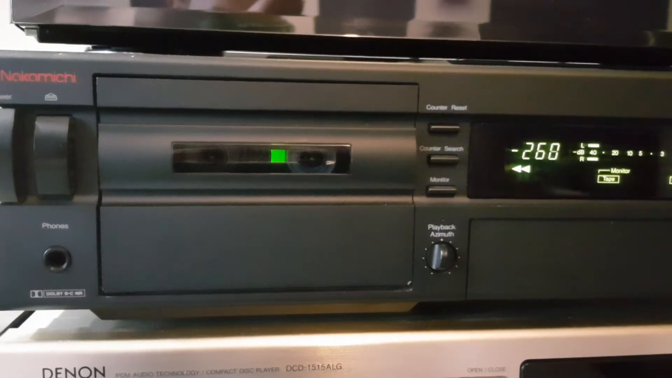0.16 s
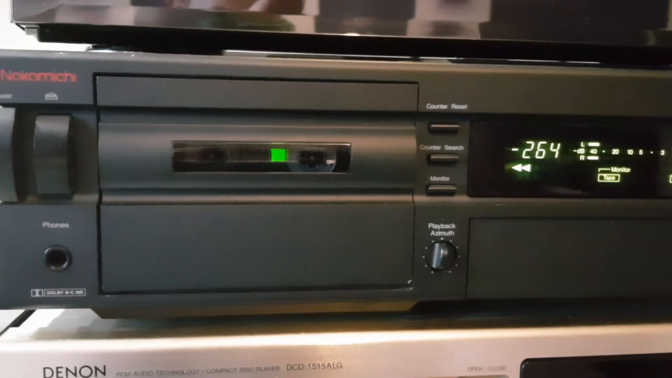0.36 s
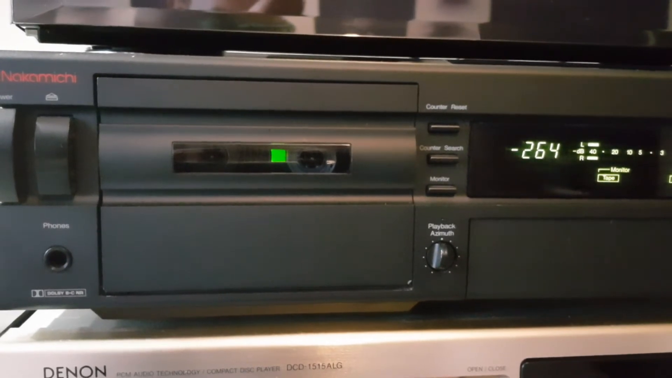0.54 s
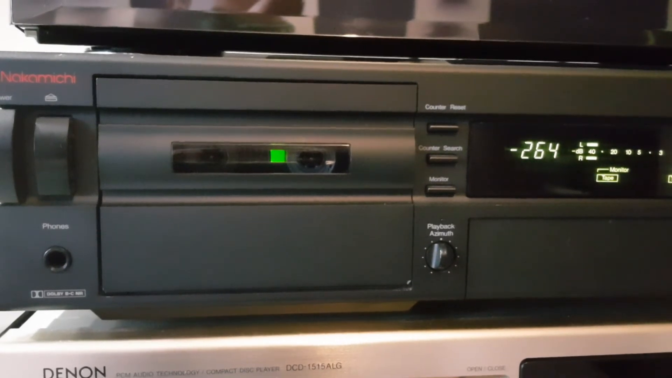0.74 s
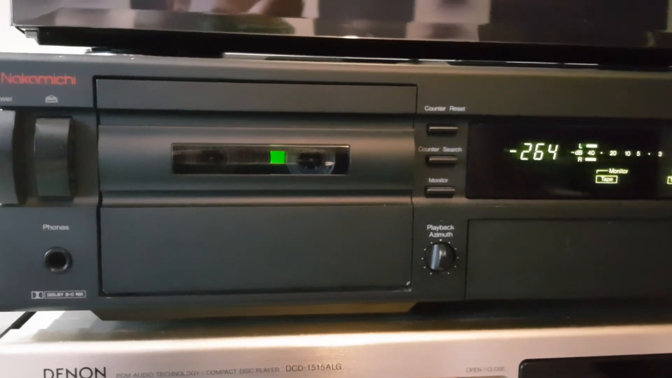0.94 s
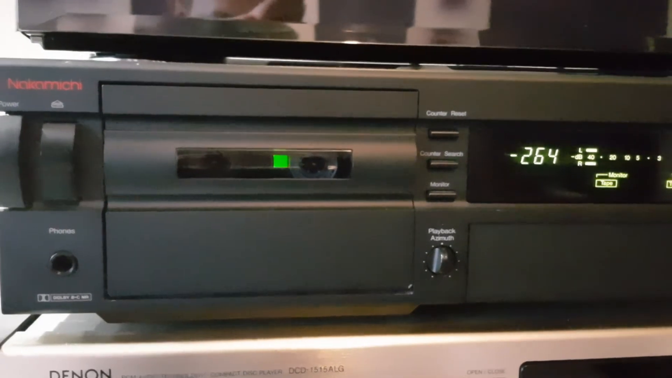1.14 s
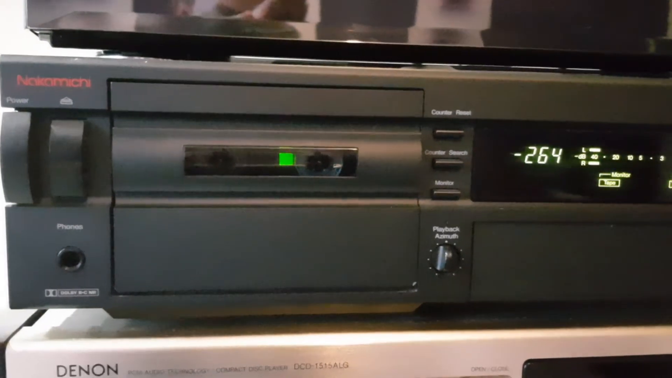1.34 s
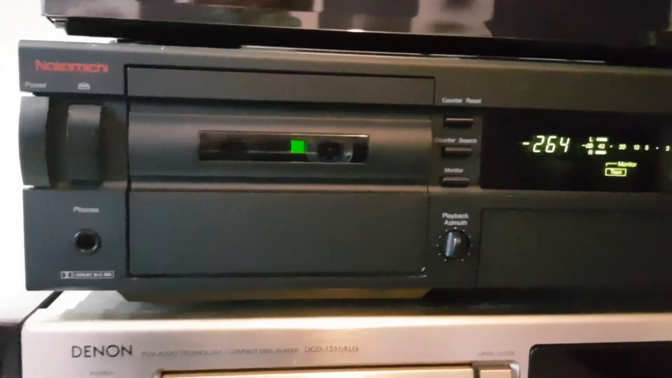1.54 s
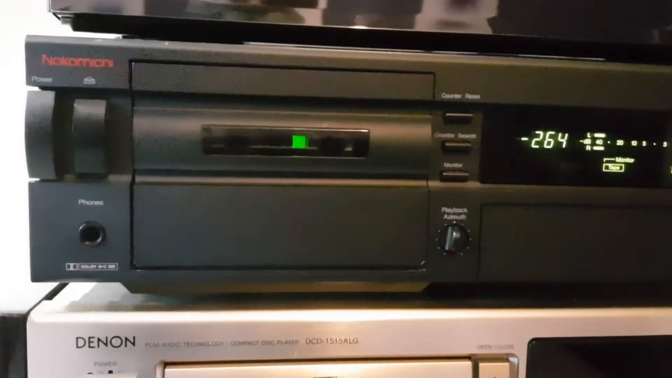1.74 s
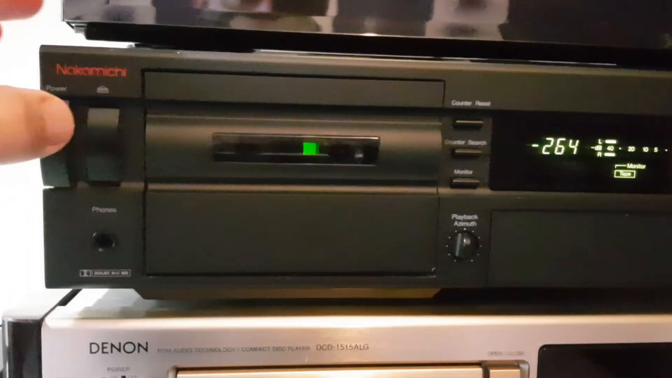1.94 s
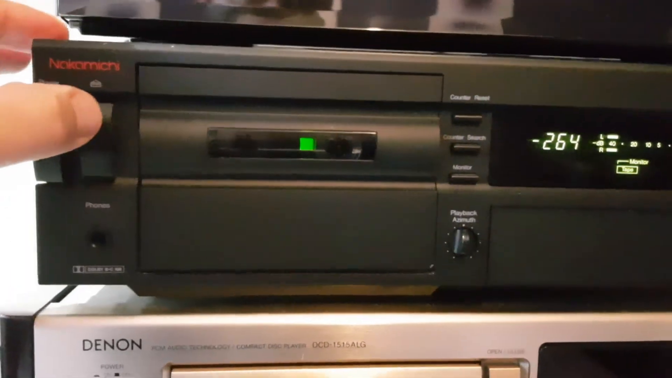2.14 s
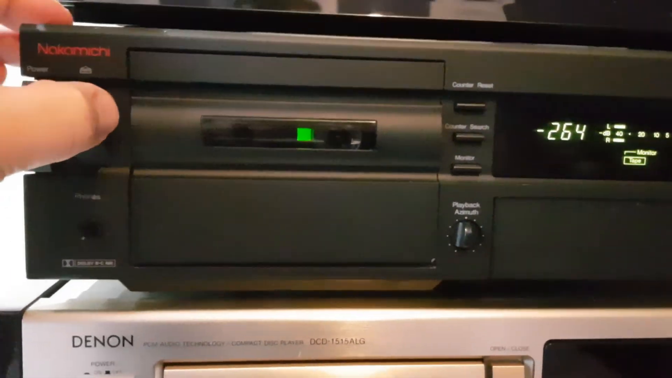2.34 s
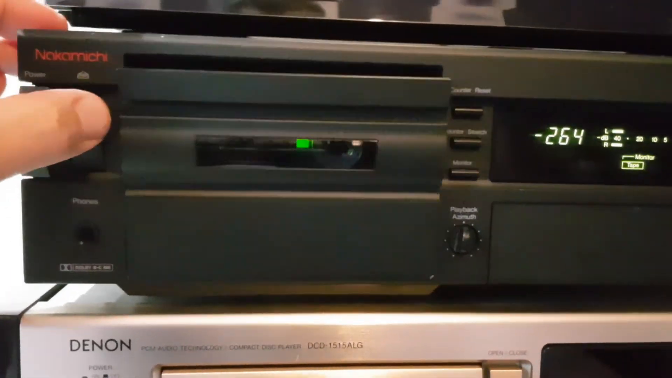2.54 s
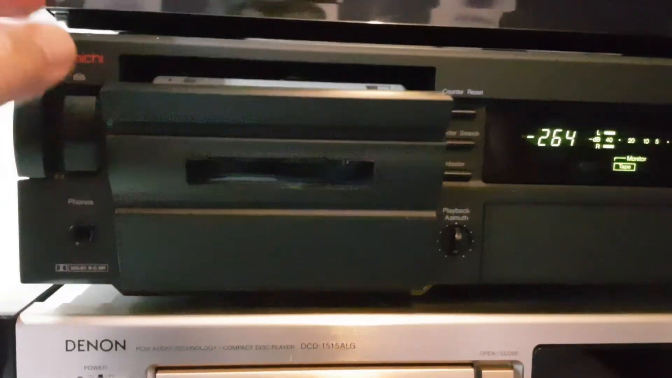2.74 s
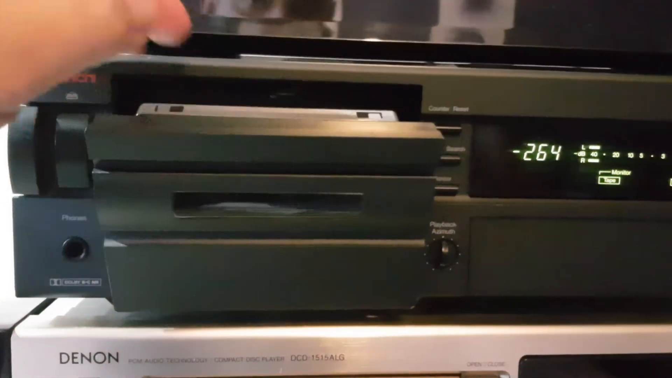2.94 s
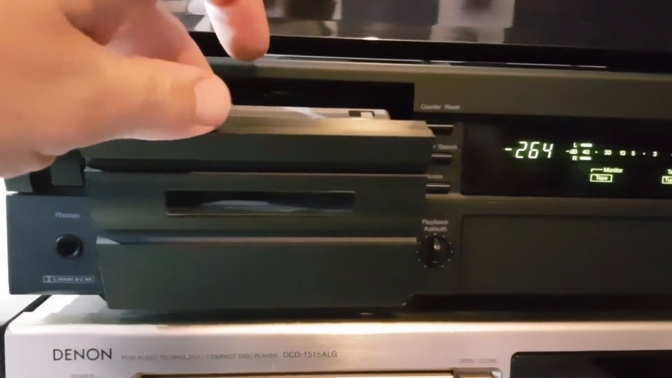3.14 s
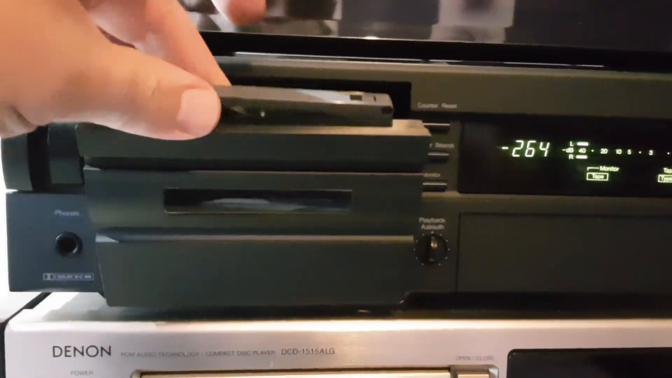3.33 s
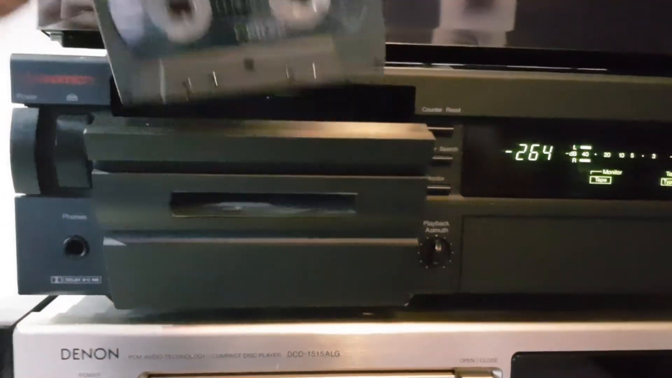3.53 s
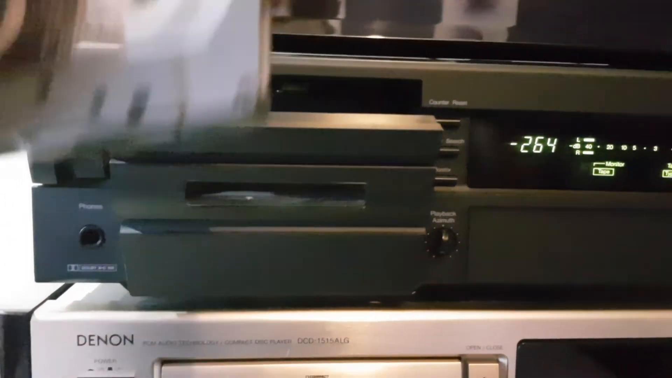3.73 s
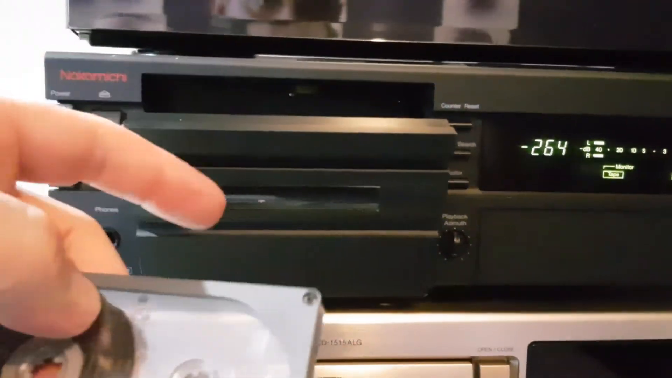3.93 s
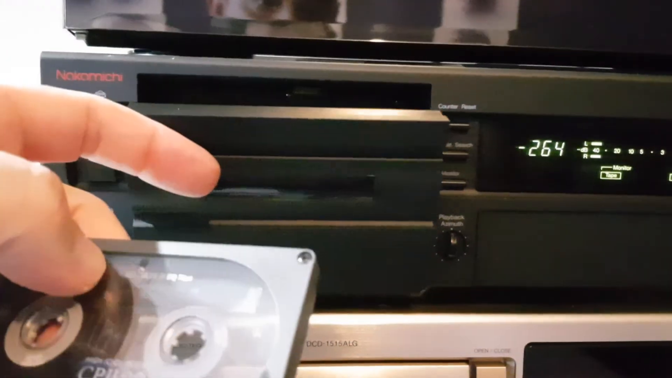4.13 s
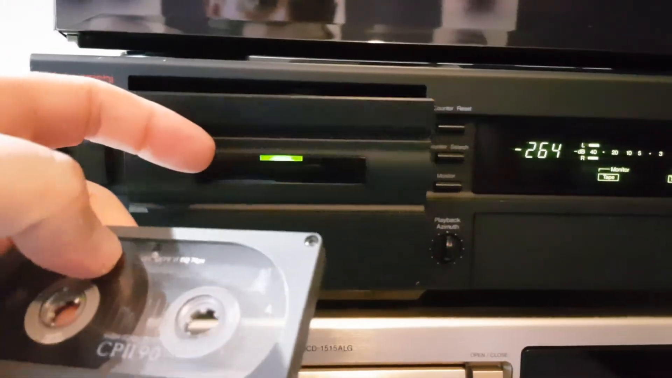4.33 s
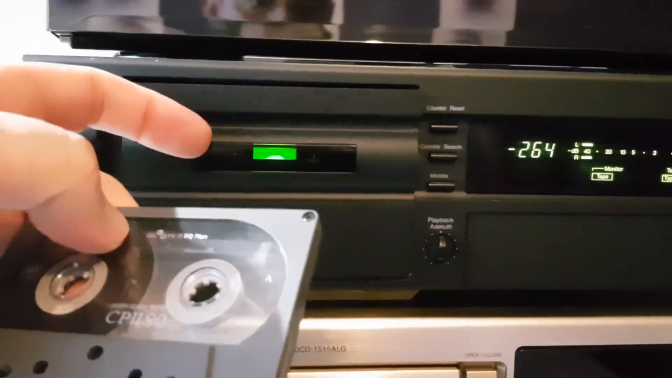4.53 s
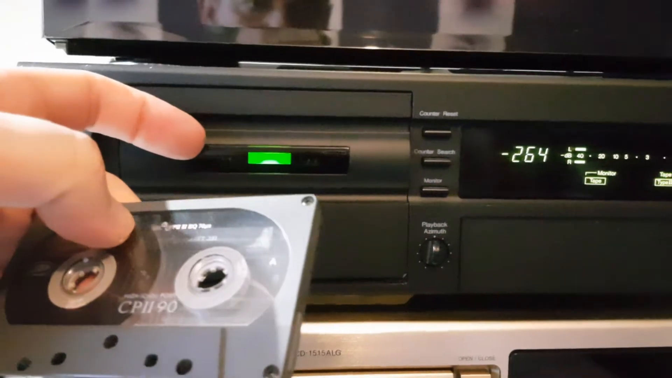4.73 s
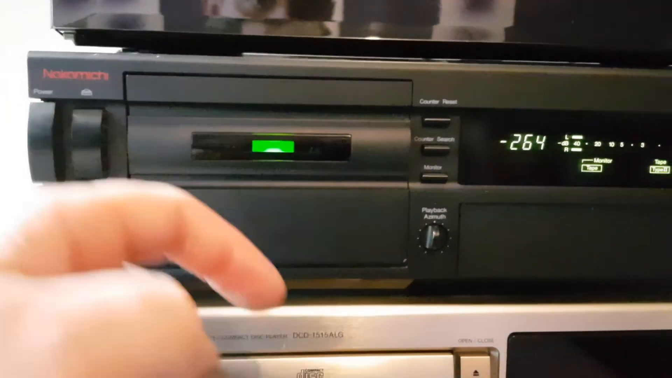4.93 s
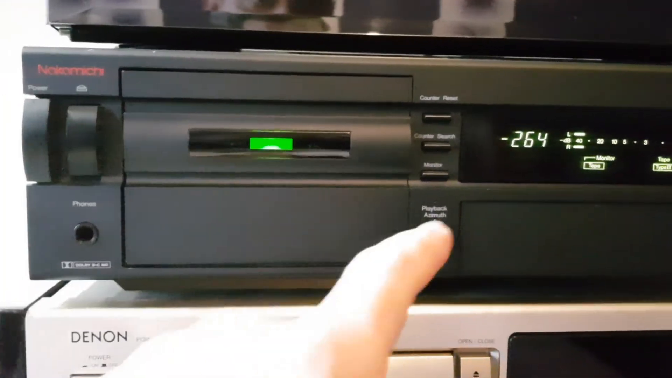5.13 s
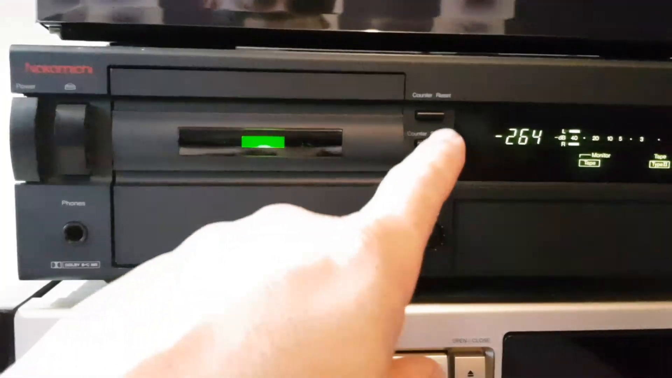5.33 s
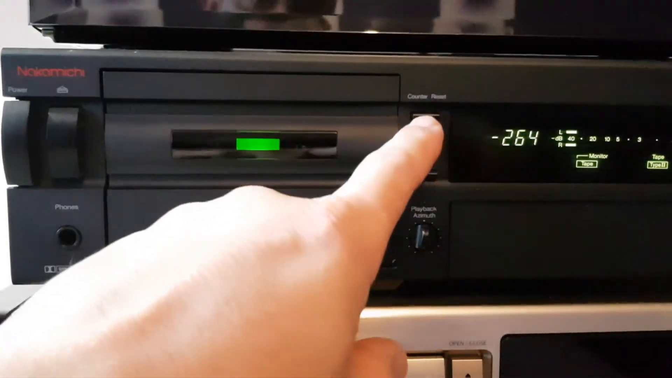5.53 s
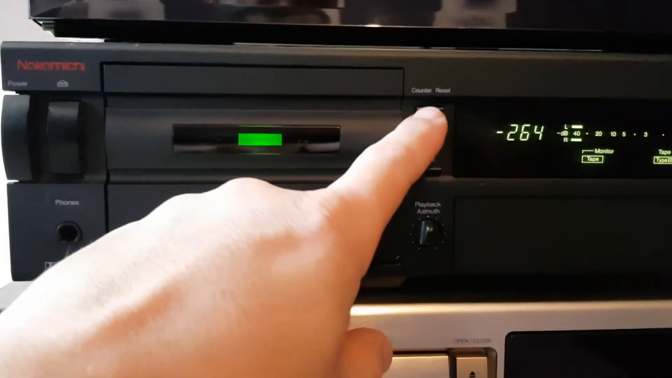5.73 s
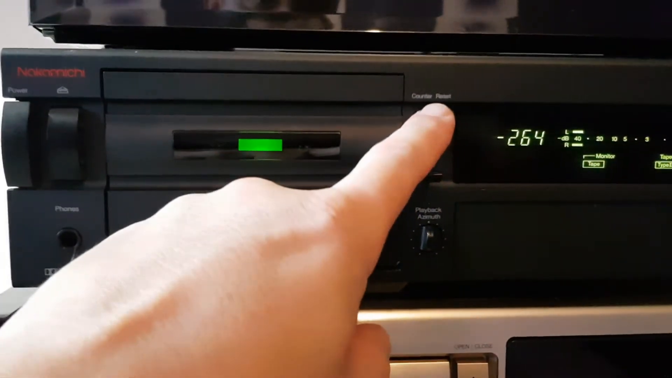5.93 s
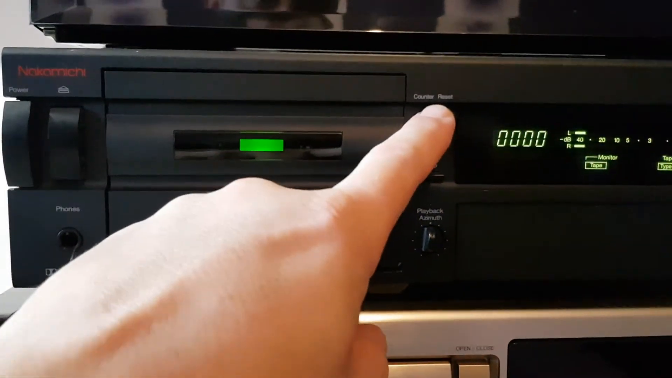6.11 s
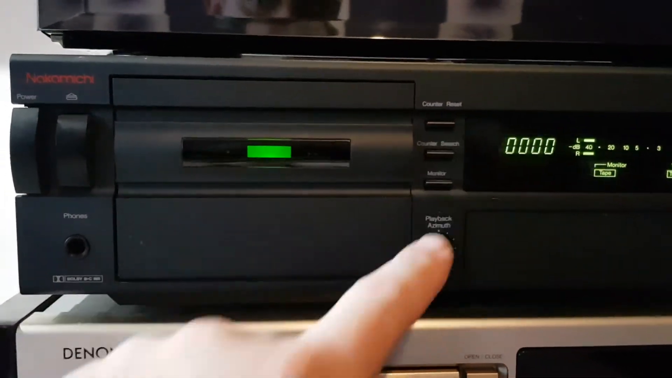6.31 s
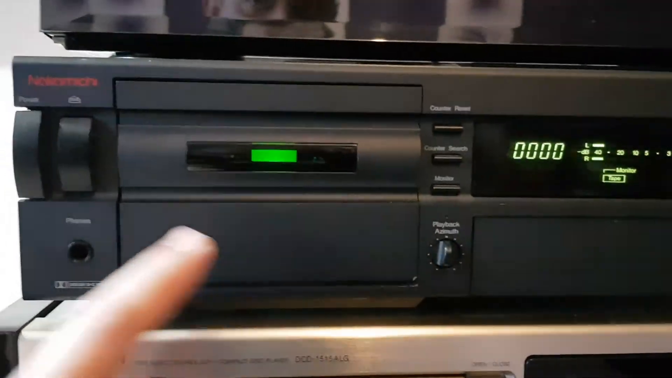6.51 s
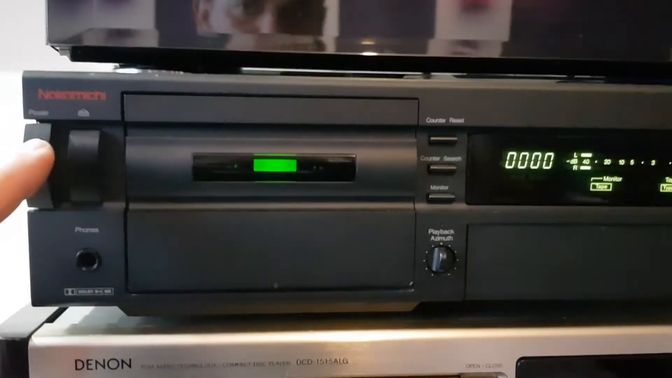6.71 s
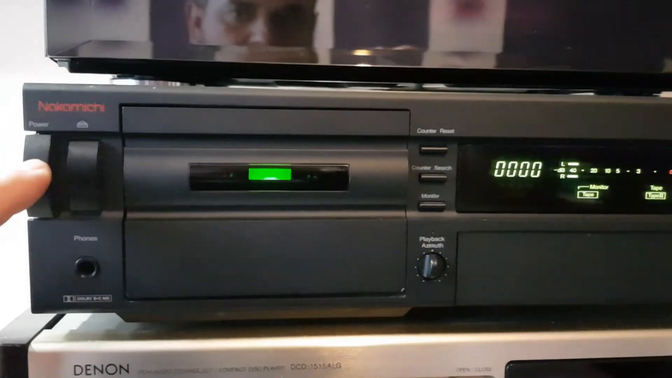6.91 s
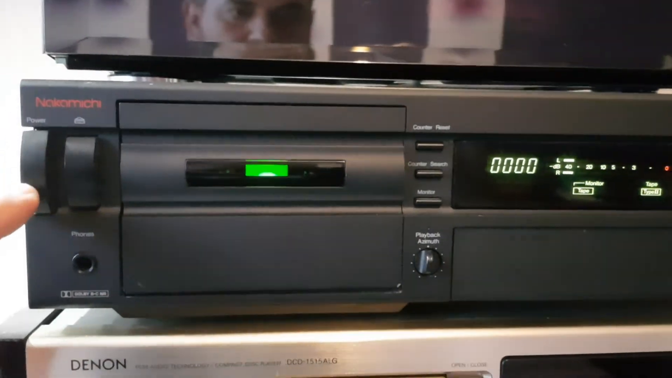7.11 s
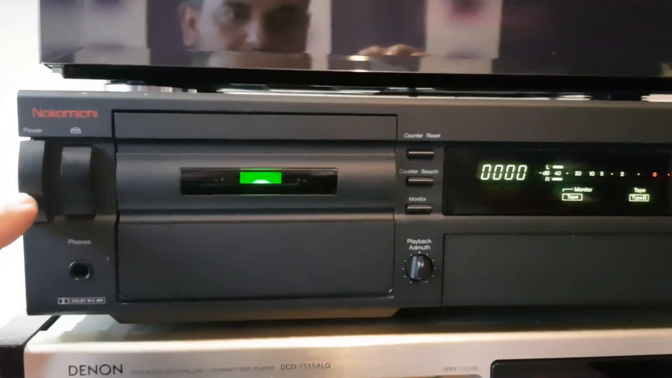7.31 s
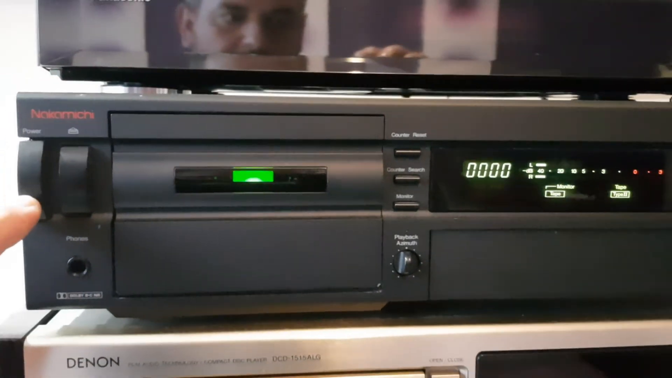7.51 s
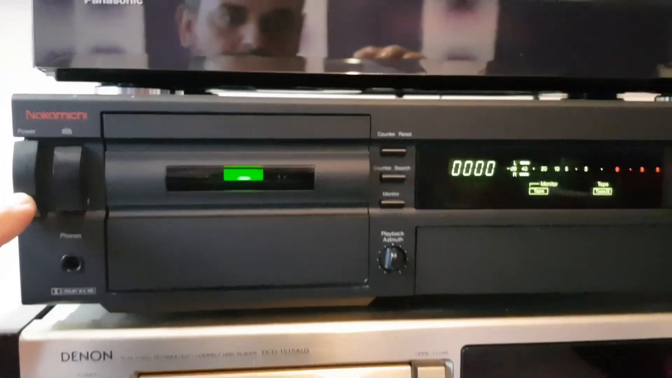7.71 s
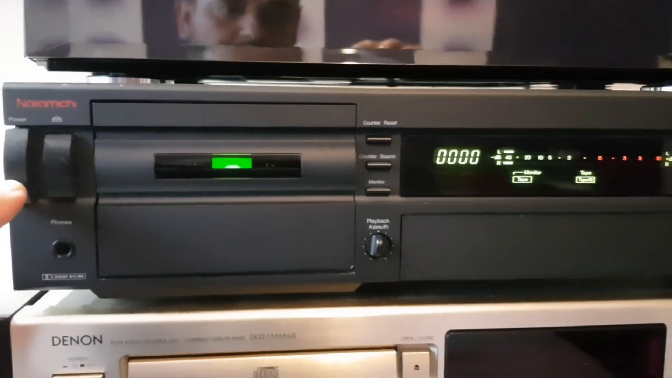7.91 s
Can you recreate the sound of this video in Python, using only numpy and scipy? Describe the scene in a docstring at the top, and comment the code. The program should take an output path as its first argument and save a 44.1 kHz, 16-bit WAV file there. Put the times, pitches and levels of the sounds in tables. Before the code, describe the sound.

A close, dry stereo scene in a quiet room with faint air and low hum. From 0 to 0.3 seconds, tape reels whir quickly with a soft, fluttering rush, then the transport stops with a loud, hard clunk and small after-clicks to about 0.5. A very thin high whine, mostly left, lingers until 1.45. A dull, faint bump comes at 0.86; a finger rubs the left microphone at 1.25 to 1.4, ending in small pops. Light lever ticks begin at 2.1, then strong plastic clacks and a short slide at 2.37 to 2.5, with lesser knocks near 2.65. From 3.2 to 3.75 a cassette scrapes and knocks lightly out of its holder. The door snaps shut crisply at 4.6. Short low motor whirs, gear rasp and clicks run from 4.75 to 5.35. A small button clicks around 5.83 and 5.97, followed by hum and a barely audible hand rustle at 6.7.

```python
"""A cassette deck rewinds to the end of the tape and its transport stops with a clunk; the eject lever is worked,
the cassette is lifted out, the door snaps shut, the motor cycles briefly and a small button is pressed.
Blows are filtered noise bursts with ringing modes, slides are noise broken into stick-slip catches, the
motor is a set of sine orders, and the reels are coloured noise with a hub rattle. A finger brushes the left
microphone, a hand rustles and bumps. All is heard close up in a quiet, dry room with a low hum."""
import sys
import numpy as np
from scipy import signal
from scipy.fft import rfft, irfft
from scipy.io import wavfile
from scipy.ndimage import uniform_filter1d

SR = 44100
rng = np.random.default_rng(int(sys.argv[2]) if len(sys.argv) > 2 else 0)


def generate_wav(signal):
    """Clip the signal to [-1, 1] and save it as 16-bit WAV at the path in sys.argv[1]."""
    frames = np.transpose(np.atleast_2d(signal))
    scaled = np.clip(frames, -1, 1) * 32767
    pcm = np.round(scaled).astype(np.int16)
    wavfile.write(sys.argv[1], SR, pcm)


N = 351036
TIME = np.arange(N) / SR  # s

THUD_EVENNESS = 0.37  # dB of relative thud gained per dB that a blow is weaker
RISE_DOUBLING_DB = 13  # loss of crack that doubles the rise time
# The five tables of blows share their columns; levels are before the trims of each part:
# [start_s, level_db, crack_db re level, tick_db re level, favoured_hz, clatter_decay_ms]
# Transport coming to a stop [start_s, level_db, crack_db, tick_db, favoured_hz, clatter_decay_ms]
TRANSPORT_STOPS = [(0.285, -43, -2, 0, 1080, 3.7), (0.292, -22.5, -12, 1, 1090, 13.5),
                   (0.296, -7.5, -27.5, -34, 1033, 3.3), (0.324, -22.5, -15, -4.5, 9800, 9.3),
                   (0.349, -21.5, -25, -35, 1440, 4.3), (0.468, -31.5, -19, -6, 8750, 1.1),
                   (0.511, -41, -11.5, -28, 2400, 15), (0.529, -38.5, -18, -14.5, 590, 1.05)]
# Lever, latch and opening door [start_s, level_db, crack_db, tick_db, favoured_hz, clatter_decay_ms]
EJECT_KNOCKS = [(2.099, -42.5, -16.5, -22.5, 970, 4.1), (2.212, -39.5, -19, -16, 2000, 1.7),
                (2.227, -35, -12.5, -32, 1090, 5.1), (2.243, -40, -13.5, -17, 1090, 2.5),
                (2.373, -17, -15.5, -18, 1770, 6.4), (2.395, -36, -7, -14, 1540, 4),
                (2.41, -26.5, -11, -10.5, 1440, 7.1), (2.419, -14.5, -20.5, -27, 1510, 17),
                (2.435, -20, -14.5, -13.5, 1500, 12), (2.445, -24, -18, -40, 1485, 9.6),
                (2.47, -40, -30, -10, 1000, 8.6), (2.516, -36, -20, -32, 1460, 7),
                (2.615, -46, -11, 3.5, 1550, 5), (2.638, -32.5, 0, -3, 1840, 15.4),
                (2.649, -24.5, -13, -17.5, 1600, 1.4), (2.657, -27.5, -20, -26, 630, 4.6)]
# Cassette against its holder [start_s, level_db, crack_db, tick_db, favoured_hz, clatter_decay_ms]
CASSETTE_KNOCKS = [(3.015, -35.5, -19.5, -21.5, 1714, 0.74), (3.215, -41.5, -23, -31, 1420, 4.2),
                   (3.233, -29.5, -25.5, -35, 1500, 2.4), (3.26, -33, -26, -27, 1560, 5.5),
                   (3.275, -26, -22.5, -31.5, 1010, 4.3), (3.426, -25.5, -26, -14, 975, 15),
                   (3.459, -23.5, -17, -24.5, 945, 11), (3.493, -22.5, -10, -21.5, 1440, 7.8),
                   (3.51, -36, -14, -22, 1850, 4.7), (3.628, -41, -16.5, -36, 1340, 18),
                   (3.667, -43, -5, -4.5, 1380, 34), (3.723, -42.5, 9, -3, 2090, 7.8)]
# Door snapping shut [start_s, level_db, crack_db, tick_db, favoured_hz, clatter_decay_ms]
DOOR_SNAPS = [(4.388, -44, -31, -37, 702, 1.7), (4.598, -18, -3.5, -3.5, 8470, 2.2),
              (4.603, -16.5, -3.5, -5, 1830, 3.1), (4.606, -22, -6, -14.5, 1086, 4),
              (4.748, -30, -17, -29, 1560, 3.2), (4.76, -34.5, -9.5, -24.5, 1050, 4.4)]
# Small clicks at the panel [start_s, level_db, crack_db, tick_db, favoured_hz, clatter_decay_ms]
PANEL_CLICKS = [(4.893, -40, -27, -5, 1520, 6.2), (4.962, -29, -13.5, -3.5, 1620, 14),
                (5.005, -29.5, -23, -36, 1680, 9), (5.112, -41.5, -34, -24, 1760, 13),
                (5.234, -44.5, -34, -30, 1090, 15), (5.277, -42.5, -27, -36, 1840, 11),
                (5.573, -39, -26, -29, 1697, 5.6), (5.712, -44.5, -10, -10, 664, 1.6),
                (5.833, -35.5, -20.5, -27.5, 1424, 3.7), (5.965, -26.5, -10.5, -18, 1620, 11.8),
                (6.128, -42, -22, -27, 660, 7.4)]

# Spectrum of the struck transport [frequency_hz, level_db]
TRANSPORT_COLOUR = [(53, -52.5), (90, -27.5), (155, 2), (229, -21), (488, -14.5), (633, -1), (821, -8),
                    (1070, -3), (1210, -18), (1440, -1.5), (2650, -22), (5650, -15), (7170, -22.5),
                    (8910, -13), (16000, -29)]
# Spectrum of the eject mechanism [frequency_hz, level_db]
EJECT_COLOUR = [(71, -47), (120, -18.5), (173, -15), (348, -25), (503, -21), (617, -12), (822, -10.5),
                (968, 3.5), (1190, -10), (1490, -1), (2480, -16), (4140, -21), (5870, -31.5), (10600, -25),
                (16000, -41)]
# Spectrum of the cassette and holder [frequency_hz, level_db]
CASSETTE_COLOUR = [(53, -45), (90, -6), (229, -4.5), (360, -8), (633, -2.5), (804, -5.5), (935, 4.5),
                   (1190, 3.5), (1470, 1), (1680, 1.5), (3150, -11.5), (4080, -7.5), (5070, -13.5),
                   (10100, -6), (16000, -19)]
# Spectrum of the door [frequency_hz, level_db]
DOOR_COLOUR = [(120,-12),(157,0.5),(260,-8),(500,-8.5),(643,-7.5),(730,-6),(1000,-5),(1750,-1),(2500,-14.5),(4200,-14),(6500,-18),(8300,-15.5),(13000,-20),(16000,-24.5)]
# Spectrum of the front panel [frequency_hz, level_db]
PANEL_COLOUR = [(53, -49), (90, -15), (172, -22), (521, -25.5), (620, -10), (858, -5.5), (956, -5.5),
                (1380, -6.5), (1680, 4), (3010, -13.5), (4650, -17), (5070, -20.5), (8910, -9),
                (14000, -16), (16000, -27)]
# Stereo balance of the transport [frequency_hz, left_minus_right_db]
TRANSPORT_BALANCE = [(150,-1.5),(1000,0),(1500,-2),(2200,6.5),(3500,5.5),(6000,8),(9000,13),(14000,7.5)]
# Stereo balance of the door and panel [frequency_hz, left_minus_right_db]
DOOR_BALANCE = [(150,-0.5),(700,-1.5),(1000,-3.5),(1500,-8.5),(2200,-3.5),(4000,-3.5),(9000,-0.5),(14000,-2.5)]
# Stereo balance of the cassette [frequency_hz, left_minus_right_db]
CASSETTE_BALANCE = [(150,-4),(1000,0),(1500,-11),(2200,2.5),(3500,-4),(9000,1),(14000,0)]
# Modes of the front and chassis [frequency_hz, level_db, t60_s]
CHASSIS_MODES = [(157,-10.5,0.66),(252,-14.5,0.22),(356,-9.5,0.64),(647,-1.5,.19),(920,-15,0.064),(1097.4,1,0.081),(1320,-4.5,0.15),(1430,-4,0.083),(1449,-7,0.12),(1707,2,0.062),(1980,-4.5,0.18),(2212,-5.5,0.17),(2833,-6.5,.15),(3590,-12,.1),(3770,-4,0.11),(4090,-8,0.14),(4000,-12,0.057),(4707,-13.5,0.089),(8160,-3,0.065),(8160,1,0.042),(9120,-11,0.12),(9800,-5.5,0.04)]

# Spectrum of the spinning reels [frequency_hz, level_db]
REEL_COLOUR = [(180, -58.5), (300, -31), (385, -15), (528, -29), (624, -19.5), (978, -10), (1080, 0),
               (1250, -12.5), (1460, -5), (1870, -4), (2570, -11.5), (5520, -17), (6620, -23.5),
               (9880, -13), (16000, -19.5)]
# Resonances of the reels and shell [frequency_hz, width_hz, level_db]
SHELL_RESONANCES = [(1075,90,-8.5),(1450,51,-10.5),(1930,120,-12),(5170,250,-18),(9680,130,-15)]
# Brief swish of the tape [start_s, length_s, level_db]
SWISHES = [(.07, 0.013, -58)]
REEL_DB, REEL_STOP_S, SPIN_DOWN_S = -52, .31, .035
# Resonances of the motor drive's whine [frequency_hz, width_hz, level_db]
WHINE_RESONANCES = [(8730,330,-2.5),(9020,110,-6),(10500,740,-4.5),(11000,450,-9.5)]
WHINE_DB, WHINE_OFF_S, WHINE_RELEASE_S = -74, 1.45, .025

# Latch and door sliding; levels before trims [start_s, length_s, body_db, treble_db]
LATCH_STROKES = [(2.305, 0.061, -56, -72), (2.362, 0.13, -42.5, -63), (2.618, 0.033, -43.5, -52)]
# Pulls on the cassette; levels before trims [start_s, length_s, body_db, treble_db]
CASSETTE_PULLS = [(3.275, 0.38, -49.5, -54), (3.41, 0.072, -34.5, -46), (3.658, .04, -41, -56),
                  (3.716, 0.016, -36, -40)]
# Rasp of the gears; levels before trims [start_s, length_s, body_db, treble_db]
GEAR_STROKES = [(4.78, .41, -58.5, -70), (4.88, 0.032, -49.5, -54), (4.932, 0.054, -39.5, -46.5),
                (5.095, .025, -69, -59.5)]
# Hand on the panel; levels before trims [start_s, length_s, body_db, treble_db]
RUSTLE_STROKES = [(5.74, 0.066, -52.5, -68), (6.7, 0.48, -68, -92), (7.32, 0.022, -64, -85)]
# Motor pushes; level before a trim [start_s, top_pitch_hz, level_db]
MOTOR_PUSHES = [(4.769, 309, -50.5), (4.94, 308, -66), (5.111, 315.5, -50), (5.248, 304.7, -57.5)]
PUSH_S, PUSH_SAG = .115, .05  # length of a push; share of the speed missing at zero effort

# Finger rubs on the left microphone [start_s, length_s, level_db]
FINGER_RUBS = [(1.252, 0.037, -52.5), (1.338, 0.056, -50), (1.412, 0.044, -71)]
# Spectrum of rubbing skin [frequency_hz, level_db]
SKIN_COLOUR = [(150,-11),(500,0),(1000,1),(1900,-4.5),(2900,-3),(5000,-13.5),(8000,-20),(16000,-25)]
# Pops at the microphone port [start_s, pitch_hz, level_db, decay_ms, crack_db]
PORT_POPS = [(1.3913,590,-17,1.86,-20),(1.401,1820,-21,1.17,-19),(1.412,197,-33,1.6,-47)]
# Spectrum of the room air [frequency_hz, level_db]
AIR_COLOUR = [(15, -46.5), (25, -14), (59, -1.5), (92, -3), (123, 0), (217, -11), (309, -12), (405, -20.5),
              (1020, -24.5), (1160, -23.5), (1520, -22), (1740, -22), (7110, -37.5), (8830, -32),
              (16000, -33)]
# Spells of low hum; level before a trim [start_s, length_s, level_db]
HUM_SPELLS = [(0, 1.35, -68.5), (4.45, 0.72, -75), (6.72, 1.1, -65)]
AIR_DB, HUM_HZ = -65, 64.6
TOP_HZ = 16000  # upper band limit


def undb(db):
    """Decibel law: amplitude gain is ten to the power of level over twenty."""
    return 10 ** (np.asarray(db) / 20)


def rms(x):
    """Root mean square of a sound."""
    return np.sqrt(np.mean(x ** 2))


def unit(x):
    """Normalisation: the centre of a stereo sound is scaled to rms 1."""
    return x / rms(x.mean(0))


def on_log(points, hz):
    """Interpolation of (Hz, value) points along a logarithmic frequency axis."""
    f, value = np.transpose(points)
    return np.interp(np.log(hz + 1), np.log(f), value)


def bins(x):
    """Discrete spectrum: the frequencies in Hz of a sound's Fourier bins."""
    return np.fft.rfftfreq(x.shape[-1], 1 / SR)


def spread(hz, corner_hz=1050):
    """Spatial coherence: long waves reach both microphones alike, short ones do not."""
    return np.minimum(0.15 + 0.63 * (hz / corner_hz) ** 2, 1)


def noise(size):
    """Partial coherence: stereo noise, alike in the bass and increasingly unrelated upward."""
    mid, side = rfft(rng.standard_normal((2, size)))
    side_share = spread(np.fft.rfftfreq(size, 1 / SR))
    return irfft(mid + np.array([[1], [-1]]) * side * side_share, size)


def colour(x, points, sides=((100, 0), (10000, 0))):
    """Linear filtering: a spectrum and a left-right level difference are imposed on a stereo sound."""
    hz = bins(x)
    db = on_log(points, hz) + np.array([[.5], [-.5]]) * on_log(sides, hz)
    return irfft(rfft(x) * undb(db), x.shape[1])


def band(x, lo_hz, hi_hz):
    """Band-pass filtering: one register of a sound is kept."""
    edges = [lo_hz, min(hi_hz, .45 * SR)]
    return signal.sosfilt(signal.butter(4, edges, "band", fs=SR, output="sos"), x)


def resonate(x, resonances):
    """Superposition of resonators (Hz, width Hz, dB) driven by one sound."""
    total = 0
    for hz, width_hz, db in resonances:
        b, a = signal.iirpeak(hz, hz / width_hz, SR)
        total = total + undb(db) * unit(signal.lfilter(b, a, x))
    return total


def grains(rate, scatter_db):
    """Stick-slip: random catches (rate per second) of uneven size die within milliseconds above a floor."""
    size_db = scatter_db * np.minimum(rng.exponential(size=N), 4)
    catches = (rng.random(N) < rate / SR) * undb(size_db)
    power = signal.lfilter([1], [1, -np.exp(-1 / (0.0045 * SR))], catches ** 2)
    return np.sqrt(power / power.mean() + 0.17)


def until(stop_s, release_s):
    """Exponential decay: full gain up to a moment, then a release."""
    return np.exp(-np.clip((TIME - stop_s) / release_s, 0, 40))


def strokes(rows, swell, release_s, order=2):
    """Envelope of movements: each swells over a share of its length, holds and dies away; order picks the dB."""
    gain = 0
    for row in rows:
        start_s, length_s = row[:2]
        rise = np.clip((TIME - start_s) / (swell * length_s), 0, 1)
        gain = gain + undb(row[order]) * rise * until(start_s + length_s, release_s)
    return gain


def room(hum_trim_db=-2, sing_db=-77):
    """Background superposition: broadband air, a sine hum and the narrow-band sing of idling machinery."""
    air = unit(colour(noise(N), AIR_COLOUR)) * undb(AIR_DB)
    narrow = [(1157, 110, 0)]
    sing = resonate(resonate(noise(N), narrow), narrow) * undb(sing_db + np.array([[-5], [3]]))
    tone = np.sqrt(2) * np.sin(2 * np.pi * HUM_HZ * TIME)  # rms 1
    hum = tone * strokes(HUM_SPELLS, swell=0.086, release_s=0.085) * undb(hum_trim_db)
    return air + sing + hum


def soft_bump(start_s=.859, hz=165, db=-50, decay_s=0.0039):
    """Critically damped envelope on a low sine: a dull bump of the hand that holds the microphone."""
    since = np.maximum(TIME - start_s, 0)
    envelope = since / decay_s * np.exp(1 - since / decay_s)
    return undb(db) * envelope * np.sin(2 * np.pi * hz * since)


def finger_on_microphone(right_db=-21):
    """Near-field friction: skin rubs over the left port, and damped tones pop as it seals and lets go."""
    rub = unit(colour(noise(N) * grains(1180, 2.5), SKIN_COLOUR))[0]
    touch = rub * strokes(FINGER_RUBS, swell=0.35, release_s=0.033)
    t = np.arange(1024) / SR
    for start_s, hz, db, decay_ms, crack_db in PORT_POPS:
        crack = unit(colour(noise(len(t)), SKIN_COLOUR)).mean(0)
        pop = undb(db) * np.sin(2 * np.pi * hz * t) + undb(crack_db) * crack
        start = int(start_s * SR)
        touch[start:start + len(t)] += pop * np.exp(-t * 1000 / decay_ms)
    return touch * undb([[0], [right_db]])


def scrape(rows, spectrum, sides, rate, scatter_db, body_db, treble_db, swell, release_s):
    """Stick-slip friction: catches excite a plastic part, with separate body and treble envelopes."""
    rough = colour(noise(N) * grains(rate, scatter_db), spectrum, sides)
    body = unit(band(rough, 804, 4070)) * strokes(rows, swell, release_s)
    treble = unit(band(rough, 4200, 20000)) * strokes(rows, swell, release_s, order=3)
    return body * undb(body_db) + treble * undb(treble_db)


def hand_rustle():
    """Dry friction: a hand rustles faintly on the panel."""
    return scrape(RUSTLE_STROKES, PANEL_COLOUR, CASSETTE_BALANCE, rate=410, scatter_db=5.0,
                  body_db=-10, treble_db=-14.0, swell=0.94, release_s=0.024)


def drive_whine():
    """Narrow-band resonance: a thin whine lingers for about a second after the reels stop."""
    whine = unit(band(resonate(noise(N), WHINE_RESONANCES), 8100, 11800))
    return whine * np.array([[1.7], [.3]]) * undb(WHINE_DB) * until(WHINE_OFF_S, WHINE_RELEASE_S)


def gear_rasp():
    """Repeated contact: very dense catches make the rasp of the cycling gears."""
    return scrape(GEAR_STROKES, PANEL_COLOUR, DOOR_BALANCE, rate=3500, scatter_db=4.0,
                  body_db=-4, treble_db=-6, swell=0.21, release_s=0.023)


def motor(wobble=.9, flicker_db=2.0, slip_rad=.4, trim_db=-4):
    """Rotational orders: multiples of a pitch that rises and sags, roughened by the meshing gears."""
    starts, top_hz, db = np.transpose(MOTOR_PUSHES)
    push = np.maximum(np.searchsorted(starts, TIME) - 1, 0)
    # each push is one arch of effort, which sets both speed and loudness
    effort = np.sin(np.pi * np.clip((TIME - starts[push]) / PUSH_S, 0, 1))
    unsteady = 1 + wobble * uniform_filter1d(rng.standard_normal(N), size=400)
    speed_hz = top_hz[push] * (1 - PUSH_SAG * (1 - effort)) * unsteady
    phase = 2 * np.pi * np.cumsum(speed_hz) / SR
    knots = np.arange(0, N / SR, .008)
    # (order, left dB, right dB)
    orders = [(2, -1.0, 2.5), (3, -5.5, -10), (4, -24, -7), (5, -22, -29), (6, -11, 0)]
    tone = 0
    for k, left_db, right_db in orders:
        flicker, slip = (np.interp(TIME, knots, row) for row in rng.standard_normal((2, len(knots))))
        gain = undb(np.array([[left_db], [right_db]]) + flicker_db * flicker)
        tone = tone + gain * np.sin(k * phase + slip_rad * np.sqrt(k) * slip)
    return tone * effort * undb(db[push] + trim_db)


def reels(turn_hz=49, flutter=0.94):
    """Flow noise and modulation: tape rushes through the shell; the emptying hub rattles once a turn."""
    unsteady = 1 + 4 * uniform_filter1d(rng.standard_normal(N), size=2000)
    turns = np.cumsum(turn_hz * unsteady) / SR
    rush = noise(N) * grains(2500, 0.78)
    shell = unit(colour(rush, REEL_COLOUR)) + resonate(rush, SHELL_RESONANCES)
    once_a_turn = (.5 + .5 * np.cos(2 * np.pi * turns)) ** 2
    hub = flutter * unit(band(noise(N), 8500, 12000)) * once_a_turn
    tilt = [(200, -7.0), (700, 3.0), (16000, -0.5)]
    sound = unit(colour(shell + hub, tilt, TRANSPORT_BALANCE))
    # steady until the tape ends, then a spin-down
    running = undb(REEL_DB) * until(REEL_STOP_S, SPIN_DOWN_S)
    return sound * (running + strokes(SWISHES, swell=.6, release_s=0.016))


def mode_waves(t):
    """Modal decay: complex ringing waves whose phase wanders slowly, so each mode rings in a narrow band."""
    hz, _, t60_s = np.transpose(CHASSIS_MODES)
    step = np.sqrt(2 * np.pi * .014 * hz[:, None] / SR)
    blur = np.cumsum(rng.standard_normal((len(hz), len(t))), axis=1) * step
    blur = uniform_filter1d(blur, size=128, axis=1)
    fade_out = np.minimum(10 * (1 - t / t[-1]), 1)
    return np.exp(np.outer(2j * np.pi * hz - np.log(1000) / t60_s, t) + 1j * blur) * fade_out


def deck_ring(waves, weight_db, sides):
    """Modal superposition: each blow meets the modes with other strengths and from another direction."""
    hz, db, _ = np.transpose(CHASSIS_MODES)
    strength, lag = rng.standard_normal((2, len(hz)))
    ears = np.array([[.5], [-.5]])
    level_db = db + weight_db + 2.5 * strength + ears * on_log(sides, hz)
    gains = undb(level_db) * np.exp(1.4j * ears * lag * spread(hz))
    # the load on the parts shifts their pitch a little from blow to blow
    shift_hz = 9 * rng.standard_normal()
    return np.imag(gains @ waves * np.exp(2j * np.pi * shift_hz * TIME[:waves.shape[1]]))


def blows(rows, spectrum, sides, body_db, ring_db, tail_db, tail_s, thud_db, thud_s, crack_db, tick_db,
          tick_share, favour_db, hard_rise_ms, contact_db=3):
    """Impact excitation: plastic clatter, sharp tick, slow chassis thud, ringing modes and a short room tail."""
    size = 16384
    t, out = np.arange(size) / SR, np.zeros((2, N + size))
    early = t < .015
    mode_hz = np.transpose(CHASSIS_MODES)[0]
    waves = mode_waves(t)
    tail = undb(tail_db) * np.exp(-t / tail_s) * (1 - np.exp(-t / 0.0026))
    # bass builds up slowly in the chassis
    bloom = (1 - np.exp(-t / 0.0081)) * np.exp(-t / thud_s)
    for start_s, db, crack, tick, favoured_hz, clatter_ms in rows:
        thud = -THUD_EVENNESS * db
        rise_ms = hard_rise_ms * 2 ** (-crack / RISE_DOUBLING_DB)

        def favour(hz):
            """Point excitation: the spot that is struck favours resonances near one frequency."""
            return favour_db * np.exp(-(np.log2((hz + 1) / favoured_hz) / .09) ** 2)

        coloured = colour(noise(size), spectrum, sides)
        dense = irfft(rfft(coloured) * undb(favour(bins(t))))
        ring = undb(ring_db - 10.5) * unit(deck_ring(waves, favour(mode_hz), sides))
        attack = 1 - np.exp(-t * 1000 / max(rise_ms, .05))
        # loose parts touch many times, each contact with its own strength
        contacts = np.interp(t, t[::64], rng.standard_normal(size // 64))
        clatter = np.exp(-t * 1000 / max(clatter_ms, 1)) * undb(contact_db * contacts)
        # (low edge Hz, high edge Hz, envelope, dB); tick_share scales the decay time of the top register
        registers = [(92, 431, bloom, thud + thud_db),
                     (570, 2200, clatter + tail, body_db),
                     (2310, 5000, clatter + tail, crack + crack_db),
                     (5300, 16000, clatter ** (1 / tick_share) + tail, tick + tick_db)]
        start = int(start_s * SR)
        for lo_hz, hi_hz, envelope, register_db in registers:
            burst = unit(band(dense, lo_hz, hi_hz)) * envelope
            part = attack * (burst + band(ring, lo_hz, hi_hz))
            out[:, start:start + size] += undb(db + register_db) * part / rms(part.mean(0)[early])
    return out[:, :N]


def small_clicks():
    """Light impact: small clicks of the cycling transport and button excite the panel."""
    return blows(PANEL_CLICKS, PANEL_COLOUR, DOOR_BALANCE, body_db=-12.5, ring_db=-4.5, tail_db=-15.0,
                 tail_s=0.049, hard_rise_ms=0.36, thud_db=-47, thud_s=0.064, crack_db=-5, tick_db=-9.0,
                 tick_share=0.33, favour_db=6.5)


def door():
    """Impact at a hinged panel: the door snaps shut, with strongly favoured resonances."""
    return blows(DOOR_SNAPS, DOOR_COLOUR, DOOR_BALANCE, body_db=-12, ring_db=-6.5, tail_db=-15.0,
                 tail_s=.028, hard_rise_ms=.45, thud_db=-32, thud_s=0.042, crack_db=-7, tick_db=-2.5,
                 tick_share=1.0, favour_db=18.0)


def cassette():
    """Impact and friction: the cassette knocks as pulls slide it out of its holder."""
    knocks = blows(CASSETTE_KNOCKS, CASSETTE_COLOUR, CASSETTE_BALANCE, body_db=-13.5, ring_db=-18.5,
                   tail_db=-25.0, tail_s=0.062, hard_rise_ms=0.47, thud_db=-46, thud_s=0.076,
                   crack_db=-5.5, tick_db=-2.0, tick_share=0.38, favour_db=14.0)
    slide = scrape(CASSETTE_PULLS, CASSETTE_COLOUR, CASSETTE_BALANCE, rate=320, scatter_db=3.0,
                   body_db=-10.5, treble_db=-12, swell=0.14, release_s=0.02)
    return knocks + slide


def eject():
    """Impact and friction: lever, latch and opening door knock while latch and door slide."""
    knocks = blows(EJECT_KNOCKS, EJECT_COLOUR, DOOR_BALANCE, body_db=-12.0, ring_db=-11.5, tail_db=-24,
                   tail_s=0.043, hard_rise_ms=0.64, thud_db=-42.0, thud_s=.05, crack_db=-6.5, tick_db=-7,
                   tick_share=0.46, favour_db=10.0)
    slide = scrape(LATCH_STROKES, EJECT_COLOUR, DOOR_BALANCE, rate=440, scatter_db=-7.0,
                   body_db=-3, treble_db=-1, swell=0.078, release_s=0.018)
    return knocks + slide


def transport():
    """Impact of a stopping mechanism: the transport halts with a clunk."""
    return blows(TRANSPORT_STOPS, TRANSPORT_COLOUR, TRANSPORT_BALANCE, body_db=-16.0, ring_db=-14.0,
                 tail_db=-21, tail_s=0.032, hard_rise_ms=.35, thud_db=-40, thud_s=0.026, crack_db=-4,
                 tick_db=-6.5, tick_share=0.74, favour_db=8.5)


def scene():
    """Superposition of the room, the hand and the deck's moving parts."""
    hand = soft_bump() + finger_on_microphone() + hand_rustle()
    drive = drive_whine() + gear_rasp() + motor() + reels()
    handling = small_clicks() + door() + cassette() + eject()
    return room() + hand + drive + handling + transport()


def record(dry, low_cut_hz=34):
    """Band limiting: the deep bass is thinned and the top of the treble is cut."""
    thin = signal.sosfilt(signal.butter(2, low_cut_hz, "high", fs=SR, output="sos"), dry)
    return signal.sosfilt(signal.ellip(10, .2, 75, TOP_HZ, fs=SR, output="sos"), thin)


dry = scene()
out = record(dry)
generate_wav(out)
```